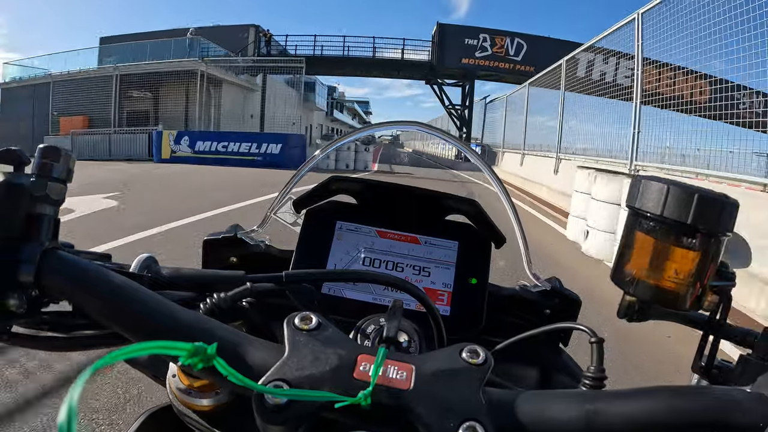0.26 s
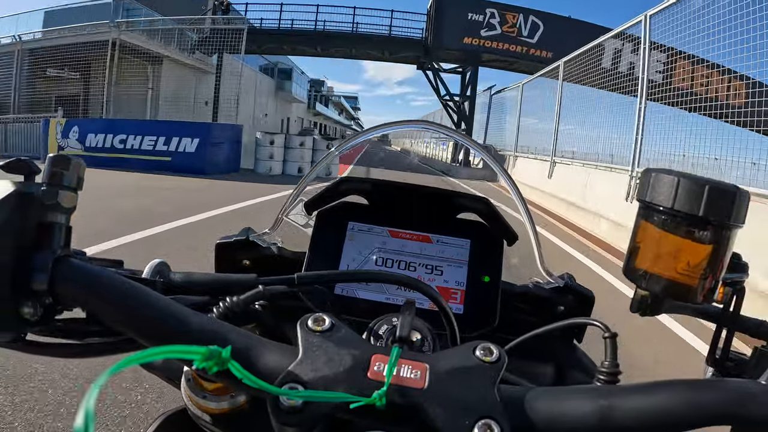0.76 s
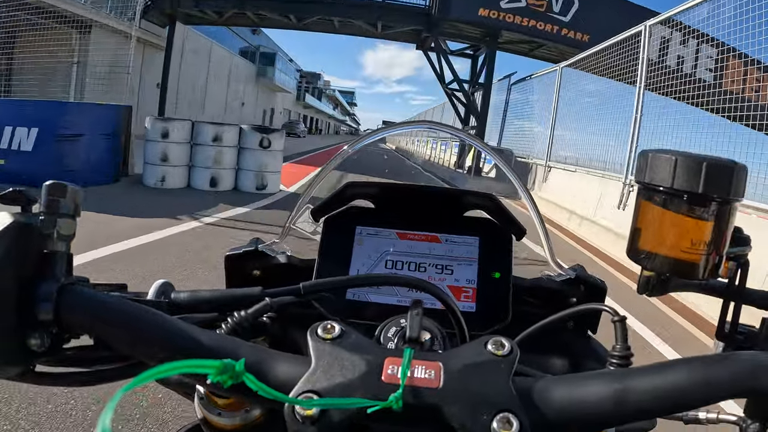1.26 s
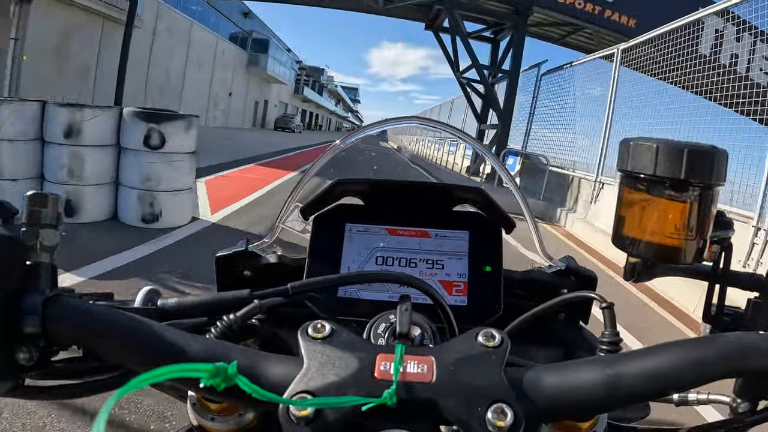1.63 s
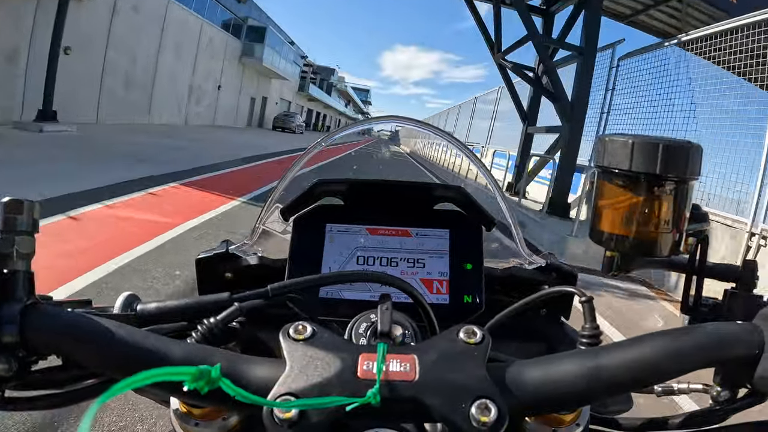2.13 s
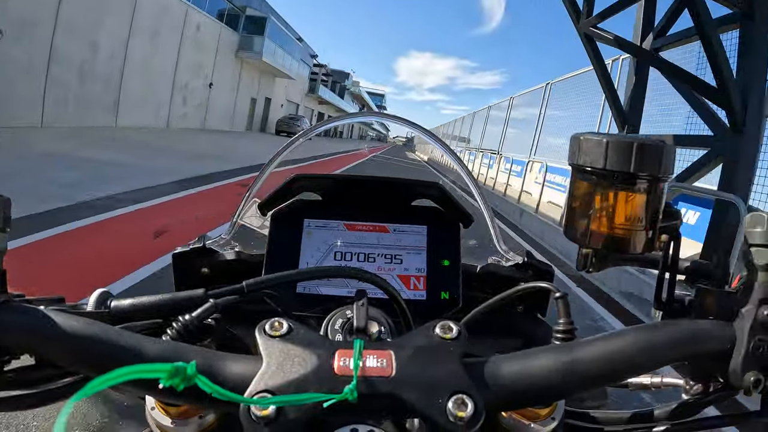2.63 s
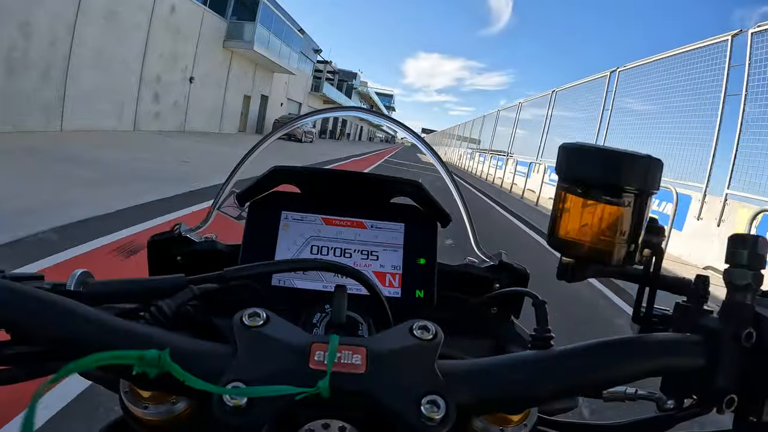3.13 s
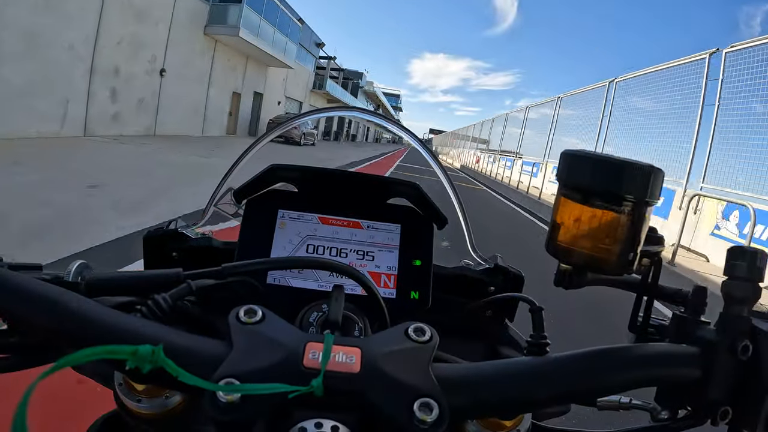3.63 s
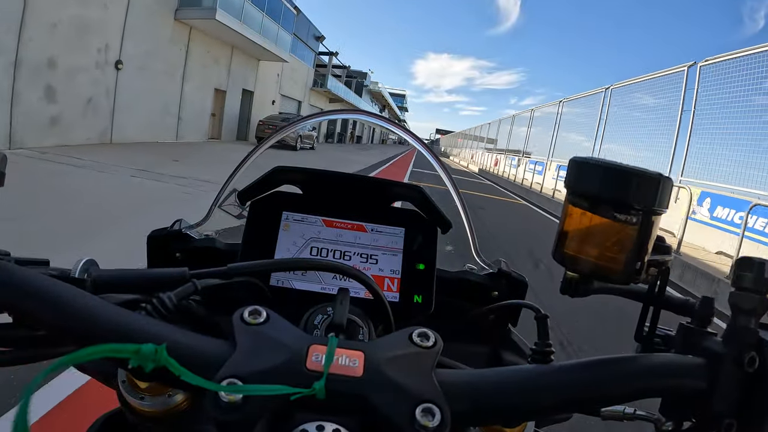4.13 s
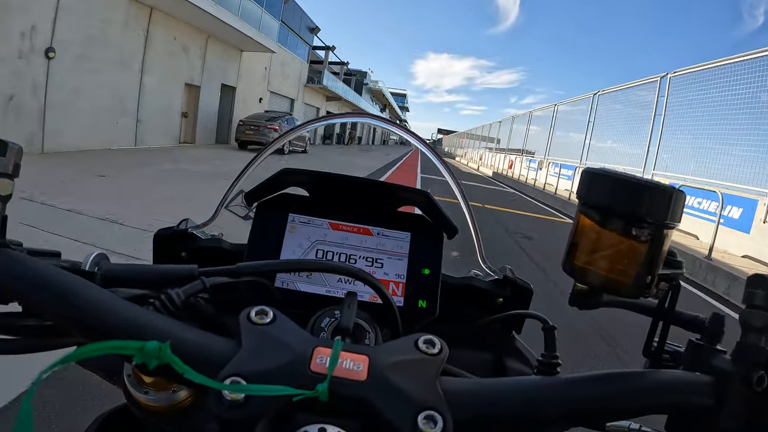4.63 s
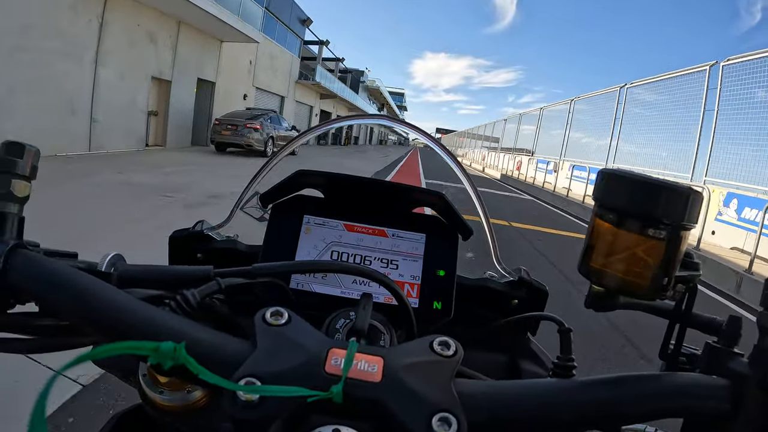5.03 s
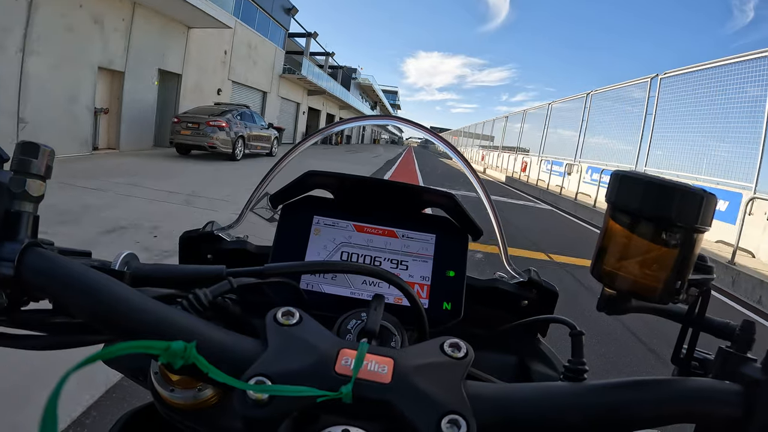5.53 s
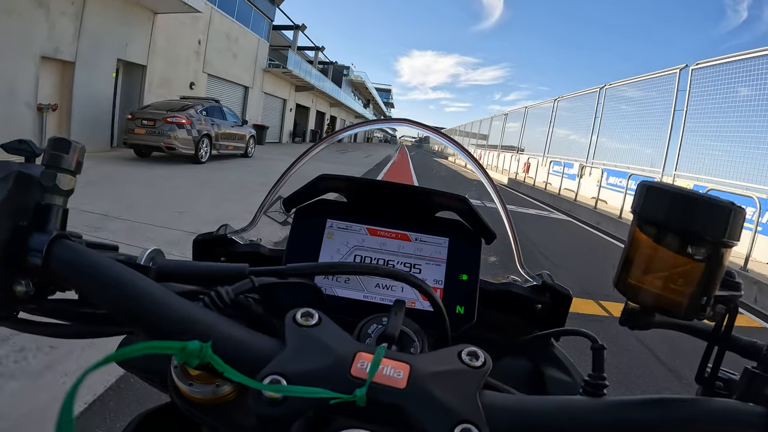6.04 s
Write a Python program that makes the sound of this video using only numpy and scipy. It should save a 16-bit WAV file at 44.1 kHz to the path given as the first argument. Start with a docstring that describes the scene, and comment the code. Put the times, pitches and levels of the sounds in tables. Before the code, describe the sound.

From 0 s, close behind the screen of a coasting motorcycle, a low, lumpy four-cylinder idle sags slightly under a droning fairing, fine metallic clatter and a falling chain hum. Small clicks come at 0.2 and 0.7 s, then knocks gather from 0.75 s. Around 1.15 s a heavy clunk with bright clicks marks the shift to neutral, and the chain hum slackens; a panel briefly sings upward at 1.3 s and another thud lands at 1.6 s. Wind flutters deeply from 1.9 to 2.5 s, with gusts afterwards. At 2.9 s a click and thud precede a drop to a quieter, darker sound: faint engine, muffled rumbling wind and light taps. From 4 s the chain hum returns, sinking; a brief grating burr comes near 4.6 s. A falling panel note sounds at 5.4 s, a rap at 5.5 s, and the idle re-emerges. Sharp knocks and rattling cluster from 5.95 to 6.2 s, ending at 6.3 s.

```python
"""In a pit lane, a four-cylinder motorcycle coasts by, heard from a microphone behind its screen.
The exhaust is a sum of partials of the firing cycle; the chain's hum sinks with the road speed.
Pulsed noise makes the engine's clatter; decaying noise and tones make the gearbox's clunk into neutral.
Shaped noise makes the wind's buffeting. About halfway the sound turns quieter and darker;
later the drive grates briefly and loose parts knock as the bike slows."""
import sys
import numpy as np
from scipy.fft import rfft, irfft, next_fast_len
from scipy.io import wavfile
from scipy.ndimage import uniform_filter1d, minimum_filter1d, map_coordinates

SR = 44100
rng = np.random.default_rng(int(sys.argv[2]) if len(sys.argv) > 2 else 0)


def inscribe(sig):
    """Save sig as 16-bit PCM at rate SR to the path in sys.argv[1].

    A 1-D sig is mono; a 2-D sig holds one channel per row.
    Samples are clipped to [-1, 1] before scaling.
    """
    pcm = np.round(np.clip(np.atleast_2d(sig).T, -1, 1) * 32767)
    wavfile.write(sys.argv[1], SR, pcm.astype(np.int16))


N = 277370

# Spectral densities (density_db) and partial levels are relative where the sum is scaled to rms 1.
# EARLY and LATE tables hold before and after the drop about halfway.

# idle speed in four-stroke cycles: time_s, cycle_rate_hz
IDLE_SPEED = [(0, 13.4), (.2, 13.29), (.45, 12.98), (.7, 12.8), (.9, 12.36), (1.1, 12.31), (1.3, 12.45),
              (1.55, 12.45), (1.9, 11.84), (2.3, 12.2), (2.8, 11.8), (6.29, 11.83)]
# strength of the exhaust: time_s, level_db
EXHAUST_LEVEL = [(0, -16), (.5, -18), (1.8, -16.5), (2.2, -22.5), (2.75, -20.5), (3.2, -29.5), (4.5, -36.5),
                 (5.4, -39.5), (5.7, -31), (6.29, -26.5)]
# partials of the exhaust: multiple_of_cycle_rate, level_db
EXHAUST_PARTIALS = [(3, -11), (4, -10), (5, 1.5), (7, -4.5), (8, 3), (9, -6), (11, -12), (12, -3.5),
                    (13, -3), (14, -5.5), (15, -7), (17, -3.5), (18, -7.5), (20, -11), (24, -9.5),
                    (28, -10.5), (30, -7), (32, -7.5), (33, -8), (35, -13)]
# how the pipes favour each partial as the idle drifts: frequency_hz, gain_db
PIPE_RESPONSE = [(61, 4), (64.5, 1), (67, -7), (80, 0), (98, -2), (106, 1.5), (125, 2.5), (149, 3),
                 (162, 1), (172, -1.5), (200, -0.5), (217, 2), (228, -0.5), (300, -1)]

# chain links meeting the sprocket, in step with the road speed: time_s, link_rate_hz
LINK_RATE = [(0, 196.6), (.5, 181.7), (1, 167), (1.5, 166), (3.6, 123), (4.3, 114.5), (4.6, 107),
             (4.9, 99.8), (5.25, 89.8), (5.5, 81), (5.62, 75.5), (5.8, 71), (6.29, 62)]
# strength of the chain's hum, which slackens at the gear change: time_s, gain_db
CHAIN_LEVEL = [(0, -24.5), (.85, -22), (1.15, -39.5), (3.7, -39.5), (4.3, -28.5), (5, -27), (5.35, -31),
               (5.5, -27), (5.72, -26), (5.8, -33.5), (5.87, -39.5), (6.29, -34)]
# partials of the chain: multiple_of_link_rate, level_db
CHAIN_PARTIALS = [(1, -4), (1.26, -7), (2, -0.5), (3, -13.5), (4, -5.5), (5, -16.5), (6, -12.5), (8, -16.5)]
# how the frame and fairing answer the chain: frequency_hz, gain_db
FRAME_RESPONSE = [(85, -17), (100, -10), (125, -14), (141, 6.5), (151, 5), (166, -3.5), (180, -5.5),
                  (205, -11), (228, -3.5), (290, -12.5), (325, -12), (345, -2), (390, 1.5), (428, -4),
                  (460, -12.5), (520, -16.5), (600, -13.5), (655, -10.5), (715, -28), (780, -24.5),
                  (835, -14.5), (890, -26), (960, -19), (1030, -28.5), (1400, -40.5)]
# flutter of the hum as the links seat unevenly: rough depth, and random knots per second
FLUTTER_DB, FLUTTER_HZ = 1.4, 22
# low frame resonance that swells the deep thrum
THRUM_HZ, THRUM_WIDTH_HZ, THRUM_DB = 61, 7.7, -0.5

# reference strength of the mechanical noise: time_s, level_db
MACHINE_LEVEL = [(0, -21), (1.9, -21), (2.65, -28), (2.93, -28), (3.1, -41.5), (3.6, -37), (4.2, -36),
                 (4.7, -34), (5.6, -30), (6.29, -32)]
# fairing's drone before the drop: frequency_hz, density_db
DRONE_EARLY = [(200, -24), (310, -12.5), (380, 0.5), (440, 0), (515, -11.5), (590, -6.5), (665, -12.5),
               (715, -24.5), (1200, -53.5)]
# fairing's drone after the drop: frequency_hz, density_db
DRONE_LATE = [(200, -21.5), (255, -8), (310, -18), (385, -0.5), (425, -0.5), (470, -8.5), (520, -12),
              (600, -12.5), (670, -10.5), (720, -23), (1200, -45.5)]
# fairing's rattle before the drop: frequency_hz, density_db
RATTLE_EARLY = [(600, -29.5), (730, -1.5), (835, 2.5), (940, 3), (1040, -4), (1170, -4.5), (1290, -1.5),
                (1420, -12), (1800, -24.5), (3500, -57.5)]
# fairing's rattle after the drop: frequency_hz, density_db
RATTLE_LATE = [(600, -24.5), (730, -3.5), (835, 0.5), (940, 0.5), (1040, -1.5), (1170, -6.5), (1290, -4),
               (1420, -13.5), (1800, -20.5), (3500, -56.5)]
# engine's clatter: frequency_hz, density_db
CLATTER_SPECTRUM = [(900, -14.5), (1400, -6.5), (1780, 2), (2100, -6.5), (2300, -5), (2550, -21),
                    (3050, -9.5), (3750, -11.5), (4200, -14.5), (4900, -18), (5300, -25.5), (6100, -22),
                    (8000, -35), (14000, -54.5)]
# chain rollers: frequency_hz, density_db
ROLLER_SPECTRUM = [(900, -18), (1520, 2), (1690, -5), (1900, -1), (2600, -6), (3050, -3), (3450, -6.5),
                   (3900, -3), (4950, -5.5), (5300, -15.5), (6000, -14.5), (8000, -23.5), (14000, -41)]
# ringing of the engine cases: centre_hz, width_hz, gain_db above the broad clatter
CASE_RESONANCES = [(1852, 41, -2), (3075, 210, -2), (3510, 50, -1.5), (3720, 63, 5.5), (4490, 67, -3.5),
                   (4880, 80, -1.5)]
# lifts of the fairing's rattle, the strongest near 6.1 s (0 dB leaves it as it is): start_s, length_s, lift_db
RATTLE_LIFTS = [(4.619, 0.13, 0.5), (5.288, 0.046, 0), (6.123, 0.25, 4)]
# levels relative to the machine reference
DRONE_DB, RATTLE_DB, CLATTER_DB, TAPPET_DB = -1, -18, -21.5, -61.5
# a rolling pace, and how the rattle grows for each halving of it
CRUISE_HZ, LOOSE_DB_PER_HALVING = 146, 2

# spells in which the slowing drive grates: start_s, length_s, level_db
GRATING_SPELLS = [(4.49, 0.03, -40), (4.645, .11, -40)]
# the grating: frequency_hz, density_db
GRATING_SPECTRUM = [(450, -12), (600, -2.5), (655, 7), (700, 3.5), (750, -13.5), (835, 4), (920, -21),
                    (1400, -27), (1900, -23), (2300, -35.5)]
# singing of a fairing panel: start_s, length_s, pitch_hz, glide_hz_per_s, level_db
PANEL_NOTES = [(1.28, 0.29, 402, 93, -28.5), (5.394, 0.2, 392.6, -72, -34.5)]

# clicks of gear lever and linkage: start_s, level_db, pitch_hz, t60_s, attack_s, gear_ring_db
GEAR_CLICKS = [(0.220, -33.5, 3550, .093, .001, -45), (.67, -37, 3340, 0.09, 0.0023, -42),
               (1.141, -26.5, 4300, 0.049, .002, -31.5), (1.243, -40, 4900, 0.068, 0.0017, -37),
               (1.404, -32, 4120, 0.025, 0.0013, -52), (2.8887, -30.5, 3560, .022, 0.00049, -44),
               (2.8895, -41, 8120, 0.013, 0.00033, -50)]
# a steel click: multiple_of_pitch, density_db
STEEL_SPECTRUM = [(.25, 1), (.6, -7), (0.82, -1.5), (1.15, -0.5), (1.351, -12.5), (1.749, -18.5),
                  (2.399, -33.5)]
# ring of the gears: pitch_hz, level_db, t60_s
GEAR_MODES = [(3570, -1, 0.07), (4600, -4, 0.064), (4940, -14, 0.018), (7424, -20, .06)]

# knocks of gearbox and loose parts: start_s, rap_db, thud_db, pitch_ratio
BODY_KNOCKS = [(0.476, -29, -36, 0.91), (.761, -32.5, -31, 1.16), (0.845, -30, -30, 1),
               (.871, -34, -33, 1.4), (.926, -32.5, -26, 1.1), (.962, -33, -26, 0.8),
               (1.142, -24, -21, 0.86), (1.151, -28, -14, 1.38), (1.158, -32, -12.5, 1.08),
               (1.205, -29, -26, 0.67), (1.259, -24, -21.5, 1.1), (1.33, -25.5, -31, 0.87),
               (1.573, -29, -24, 0.83), (1.62, -31, -13, 0.86), (1.697, -34.5, -31, 0.9),
               (1.894, -26, -23.5, 0.75), (2.891, -39, -21, .95), (2.92, -35, -31, 1),
               (2.943, -29, -35, .87), (3.026, -33, -32, 0.79), (3.3, -41, -48, 0.98), (3.367, -40, -54, 1),
               (3.505, -35, -43, .9), (3.545, -34, -48, .87), (3.595, -38, -52, 1.1),
               (3.719, -35, -56, 1.1), (4.111, -37, -44, 1.05), (4.142, -40.5, -45, 1.1),
               (4.641, -35, -40, 1.1), (4.895, -35, -35, 0.61), (5.302, -33, -41, 1.1),
               (5.543, -23.5, -37, 0.92), (5.812, -31, -43, 0.93), (5.957, -29, -31, 1.4),
               (5.9606, -20, -27, 0.93), (6.022, -50, -21, .96), (6.035, -26, -33, 0.95),
               (6.1, -44, -32, 0.88), (6.124, -23, -25, 1.03), (6.138, -30, -27, 1), (6.16, -28.5, -33, 1)]
# a rap on the bodywork: frequency_hz, density_db
RAP_SPECTRUM = [(300, -4.5), (560, 6.5), (850, 6.5), (1150, 7), (1500, -16.5), (2000, -14.5), (2500, -11),
                (3500, -22), (7000, -41.5), (14000, -65.5)]
# modes of the frame's thud: pitch_hz, level_db, t60_s
THUD_MODES = [(390, 5, 0.045), (445, 0.5, 0.078), (530, -14, 0.02), (603, -10.5, 0.024), (630, -10, 0.081)]
# a rap's crack (peak) and chatter (rms before decay), relative to the rap level
CRACK_DB, CHATTER_DB, CHATTER_T60_S, THUD_ATTACK_S = 3, -8, 0.032, 0.003
# small ticks of loose parts: middle level relative to the machine reference, and spread either way
TICK_DB, TICK_SPREAD_DB = -17.5, 5

# buffeting: frequency_hz, density_db
BUFFET_SPECTRUM = [(8, -12), (18, -3.5), (30, -1), (48, -1), (70, -4), (110, -10), (250, -47.5)]
# wind's roar before the drop: frequency_hz, density_db
ROAR_EARLY = [(35, -17), (70, -3.5), (110, -5), (150, -0.5), (230, -2), (310, -4), (450, -16.5), (700, -36),
              (1500, -49.5)]
# wind's roar after the drop: frequency_hz, density_db
ROAR_LATE = [(35, -20), (70, -4.5), (100, -1.5), (135, 2), (190, 0.5), (260, -3.5), (330, -13), (450, -24),
             (700, -39), (1500, -66)]
# gusts: start_s, length_s, buffet_db, roar_lift_db
WIND_GUSTS = [(0, 0.064, -42.5, 1.5), (0.467, 0.33, -21.5, 1), (2.011, 0.15, -22, 4), (2.197, 0.18, -19, 5),
              (2.49, 0.074, -14.5, 4), (2.656, 0.18, -15, 0.5), (2.85, 0.086, -17, 1.5),
              (3.062, 0.24, -19, 0), (3.388, 0.09, -19.5, 4), (3.557, 0.18, -18.5, 2),
              (3.817, 0.096, -20, 1), (3.987, 0.097, -18.5, 10), (4.147, 0.31, -21, 0.5),
              (4.607, 0.18, -22, 2.5), (5.836, 0.16, -23.5, 6), (6.022, 0.06, -19.5, 8),
              (6.175, 0.15, -25.5, 2)]
# spells in which the screen sheds eddies in step: start_s, length_s, level_db
EDDY_SPELLS = [(0.779, 0.16, -19.5), (1.925, 0.52, -17), (3.858, 0.081, -21)]
# each eddy spell counts from the same rate and sags
EDDY_HZ, EDDY_SAG_HZ_PER_S = 34, 13
# wind at the rolling pace; below that pace it weakens with each halving
BUFFET_DB, EARLY_DB, LATE_DB, WIND_DB_PER_HALVING = -35.5, -24.5, -28, 7.5
# how deeply each eddy pumps the early roar (0-1), and the rough lumps of the roar before and after the drop
PUMP, EARLY_LUMP_DB, LATE_LUMP_DB = 0.65, 1.5, 2.8
# ramps before the start and after the end of every gust or spell
SWELL_ATTACK_S, SWELL_RELEASE_S = 0.06, 0.08

LIMIT, LIMITER_SPAN_S, TOP_HZ = 0.6, 0.01, 14000


def amp(db):
    """Logarithmic level: decibels to a linear gain."""
    return 10 ** (np.asarray(db) / 20)


def unit(x):
    """Normalisation by mean power, to rms 1."""
    return x / np.sqrt(np.mean(x ** 2) + 1e-20)


def along(points, hz):
    """Interpolation of (frequency, value) points on a logarithmic frequency axis."""
    f, v = np.transpose(points)
    return np.interp(np.log(hz + 1), np.log(f + 1), v)


def curves(rows):
    """Linear interpolation in time: one value per sample for each column after the first."""
    s, *cols = np.transpose(rows)
    return [np.interp(np.arange(N) / SR, s, c) for c in cols]


def noise(size=N):
    """White noise: independent normal samples."""
    return rng.standard_normal(size)


def wobble(rate):
    """Slow random fluctuation: a smooth curve through this many random knots a second."""
    knots = noise(int(N * rate / SR) + 4)
    return map_coordinates(knots, [np.arange(N) * rate / SR])


def filtered(x, response):
    """Linear filtering: multiplication by a function of frequency."""
    m = next_fast_len(len(x) + 8192)
    return irfft(rfft(x, m) * response(np.fft.rfftfreq(m, 1 / SR)), m)[:len(x)]


def coloured(x, spectrum):
    """Spectral shaping to rms 1, with a response that keeps falling above the last point."""
    top_hz = spectrum[-1][0]
    return unit(filtered(x, lambda hz: amp(along(spectrum, hz)) / (1 + (hz / top_hz) ** 2)))


def steady(x, span):
    """Power levelling: evens out a noise's slow swells and keeps its fast flutter."""
    power = uniform_filter1d(x ** 2, max(int(span * SR), 1))
    return x / np.sqrt(np.abs(power) + 1e-9)


def add(track, s, sound):
    """Superposition of a sound on a track from time s."""
    part = track[round(s * SR):][:len(sound)]
    part += sound[:len(part)]


def strokes(turns, sharp):
    """Periodic excitation: one smooth peak for each whole turn, at rms 1."""
    return unit(np.exp(sharp * np.cos(2 * np.pi * turns)))


def swell(start, length):
    """Envelope of a gust or spell: linear rise, hold and linear release."""
    t = np.arange(N) / SR - start
    rise = 1 + t / SWELL_ATTACK_S
    fall = 1 - (t - length) / SWELL_RELEASE_S
    return np.clip(np.minimum(rise, fall), 0, 1)


def drop_blend(early, late):
    """Equal-power crossfade: about halfway one colour of sound gives way to another."""
    share = curves([(2.94, 0.05), (3.09, 0.93)])[0]
    return np.sqrt(1 - share) * early + np.sqrt(share) * late


def struck(spectrum, size):
    """Minimum-phase impulse response: a body's sharp, causal answer to one blow, at peak 1."""
    magnitude = amp(along(spectrum, np.fft.rfftfreq(2 * size, 1 / SR)))
    cepstrum = irfft(np.log(magnitude))[:size]
    causal = 2 * cepstrum * (np.arange(size) > 0)
    answer = irfft(np.exp(rfft(causal, 2 * size)))[:size]
    return answer / np.abs(answer).max()


def exhaust(cycle, cycle_hz, rough_db):
    """Periodic firing: uneven burns put fluttering lines on many multiples of the cycle rate."""
    note = np.zeros(N)
    for k, db in EXHAUST_PARTIALS:
        level_db = db + along(PIPE_RESPONSE, k * cycle_hz) + rough_db * wobble(6)
        note += amp(level_db) * np.sin(2 * np.pi * (k * cycle + rng.random()))
    return amp(curves(EXHAUST_LEVEL)[0]) * unit(note)


def machine(cycle, links, pace):
    """Forced vibration: firings, valves and chain rollers shake fairing and cases in quick bursts."""
    machine_db = curves(MACHINE_LEVEL)[0]
    idle = strokes(4 * cycle, sharp=0.13) * strokes(6 * cycle, sharp=0.062) * strokes(3 * cycle, sharp=0.024)
    rollers = strokes(links, sharp=0.15)

    def bursts(beat, grain_db):
        return beat * amp(grain_db * wobble(200)) * noise()

    def blend(early_spectrum, late_spectrum, idle_grain_db, roller_grain_db):
        # after the drop the rollers stand out over the idle
        return drop_blend(coloured(bursts(idle, idle_grain_db), early_spectrum),
                          coloured(bursts(rollers, roller_grain_db), late_spectrum))

    drone = steady(blend(DRONE_EARLY, DRONE_LATE, -0.66, 1.7), span=0.075)
    drone = amp(machine_db + DRONE_DB) * drone

    lift_db = sum(db * swell(s, length) for s, length, db in RATTLE_LIFTS)
    rattle_db = machine_db + RATTLE_DB - LOOSE_DB_PER_HALVING * pace + lift_db
    rattle = amp(rattle_db + 1.0 * wobble(24)) * blend(RATTLE_EARLY, RATTLE_LATE, 1.0, 0.3)

    def cases(f):
        return 1 + sum(amp(db) * 1j * f * w / (c * c - f * f + 1j * f * w) for c, w, db in CASE_RESONANCES)

    metal = blend(CLATTER_SPECTRUM, ROLLER_SPECTRUM, 1.44, 1.0)
    clatter = amp(machine_db + CLATTER_DB + 0.84 * wobble(16)) * unit(filtered(metal, cases))

    # one tappet ticks more brightly than the rest, once a cycle
    bright = coloured(noise(), [(3000, -23.0), (6000, 2.5), (8500, -6.5), (11000, -21.0)])
    tappet = amp(machine_db + TAPPET_DB) * strokes(cycle, sharp=16) * bright
    return drone + rattle + clatter + tappet


def chain(links, link_hz):
    """Resonance: each sinking partial swells as it slides through a mode of the frame."""
    def partial(k):
        # slack in the chain jitters the timing, which blurs the high partials most
        jitter = 0.0014 * k ** 2.3 * wobble(45)
        return np.sqrt(2) * np.sin(2 * np.pi * (k * links + rng.random() + jitter))

    hum = np.zeros(N)
    for k, db in CHAIN_PARTIALS:
        level_db = db + along(FRAME_RESPONSE, k * link_hz) + FLUTTER_DB * wobble(FLUTTER_HZ)
        hum += amp(level_db) * partial(k)
    detuning = 2 * (link_hz * 2 / 3 - THRUM_HZ) / THRUM_WIDTH_HZ
    thrum = amp(THRUM_DB) / np.hypot(1, detuning) * partial(2 / 3)
    return amp(curves(CHAIN_LEVEL)[0]) * (hum + thrum)


def grating(links, grain_db):
    """Amplitude-modulated noise: a short rough burr pulses with the chain links."""
    rough = strokes(links, sharp=0.67) * amp(grain_db * wobble(60)) * noise()
    spells = sum(amp(db) * swell(s, length) for s, length, db in GRATING_SPELLS)
    return coloured(rough, GRATING_SPECTRUM) * spells


def clicks():
    """Impact of steel on steel: short bright noise bursts set the gears ringing."""
    out, t = np.zeros(N), np.arange(SR // 5) / SR
    for s, db, hz, t60, attack, ring_db in GEAR_CLICKS:
        spectrum = [(hz * k, level) for k, level in STEEL_SPECTRUM]
        steel = amp(db - 60 * t / t60) * coloured(noise(len(t)), spectrum)
        ring = sum(amp(ring_db + level - 60 * t / life) * np.sin(2 * np.pi * (f * t + rng.random()))
                   for f, level, life in GEAR_MODES)
        add(out, s, (1 - np.exp(-t / attack)) * (steel + ring))
    return out


def knocks():
    """Impact and modal decay: a dry crack on the bodywork, a short chatter and a thud in the frame."""
    out, t = np.zeros(N), np.arange(SR // 5) / SR
    rise = np.sin(np.pi / 2 * np.minimum(t / THUD_ATTACK_S, 1)) ** 2
    for s, rap_db, thud_db, pitch in BODY_KNOCKS:
        body = [(hz * pitch, db) for hz, db in RAP_SPECTRUM]
        crack = amp(rap_db + CRACK_DB) * struck(body, size=len(t))
        chatter = amp(rap_db + CHATTER_DB - 60 * t / CHATTER_T60_S) * coloured(noise(len(t)), body)
        thud = np.zeros(len(t))
        for hz, db, t60 in THUD_MODES:
            phase = pitch * hz * t + 0.29 * rng.standard_normal()
            thud += amp(thud_db + db - 60 * t / t60) * np.sin(2 * np.pi * phase)
        add(out, s, crack + rise * (chatter + thud))
    return out


def panel(rough_db):
    """Sympathetic vibration: a fairing panel sings on one fluttering, gliding note."""
    t = np.arange(N) / SR
    song = np.zeros(N)
    for s, length, hz, glide, db in PANEL_NOTES:
        age = t - s
        tone = np.sqrt(2) * np.sin(2 * np.pi * (hz * age + glide * age ** 2 / 2))
        song += amp(db) * swell(s, length) * tone
    return amp(rough_db * wobble(40)) * song


def ticks(count):
    """Random impacts: loose parts tap faintly, harder when the machine noise is stronger."""
    out, t = np.zeros(N), np.arange(SR // 20) / SR
    for when, size, pitch in rng.random((count, 3)):
        body = [(hz * (0.62 + 0.35 * pitch), db) for hz, db in RAP_SPECTRUM]
        level_db = TICK_DB + TICK_SPREAD_DB * (2 * size - 1)
        envelope = amp(level_db - 60 * t / 0.059) * np.minimum(t / 0.0018, 1) ** 2
        add(out, when * N / SR, envelope * coloured(noise(len(t)), body))
    return amp(curves(MACHINE_LEVEL)[0]) * out


def wind(pace):
    """Turbulence: gusts and shed eddies thump the microphone over a broad roar, deeper after the drop."""
    t = np.arange(N) / SR

    def shed(age):
        return np.sqrt(2) * np.sin(2 * np.pi * (EDDY_HZ * age - EDDY_SAG_HZ_PER_S * age ** 2 / 2))

    eddies = sum(amp(db) * swell(s, length) * shed(t - s) for s, length, db in EDDY_SPELLS)
    eddies = amp(1.1 * wobble(3.3)) * eddies
    flow = amp(WIND_DB_PER_HALVING * np.minimum(pace, 0))

    gusts = np.max([amp(db) * swell(s, length) for s, length, db, _ in WIND_GUSTS], axis=0)
    strength = np.hypot(amp(BUFFET_DB) * flow, gusts)
    buffet = strength * steady(coloured(noise(), BUFFET_SPECTRUM), span=0.041)

    pumping = 1 + PUMP * sum(swell(s, length) * shed(t - s) for s, length, _ in EDDY_SPELLS)
    early_lumps = pumping * amp(EARLY_LUMP_DB * wobble(22)) * noise()
    early = amp(EARLY_DB) * steady(coloured(early_lumps, ROAR_EARLY), span=0.24)
    late_lumps = amp(LATE_LUMP_DB * wobble(35)) * noise()
    late = amp(LATE_DB) * steady(coloured(late_lumps, ROAR_LATE), span=0.2)
    lift_db = sum(db * swell(s, length) for s, length, _, db in WIND_GUSTS)
    return eddies + buffet + flow * amp(lift_db) * drop_blend(early, late)


def scene():
    """Superposition: engine and chain turn independently, and the road speed sets the wind."""
    cycle_hz = curves(IDLE_SPEED)[0]
    cycle = np.cumsum(cycle_hz * (1 + 0.0022 * wobble(12))) / SR
    link_hz = curves(LINK_RATE)[0]
    links = np.cumsum(link_hz) / SR
    pace = np.log2(link_hz / CRUISE_HZ)  # doublings of speed above the rolling pace
    engine = exhaust(cycle, cycle_hz, rough_db=0.7) + machine(cycle, links, pace)
    drive = chain(links, link_hz) + grating(links, grain_db=3.0)
    contacts = clicks() + knocks() + panel(rough_db=1.5) + ticks(count=45)
    return (engine + drive + contacts + wind(pace))[None]


def record(dry):
    """Peak limiting and band limiting: a smoothed gain holds down peaks, then the top is cut off."""
    span = int(LIMITER_SPAN_S * SR)
    needed = np.minimum(1, LIMIT / (np.abs(dry[0]) + 1e-9))
    gain = uniform_filter1d(minimum_filter1d(needed, size=span), size=span)
    return filtered(dry[0] * gain, lambda hz: hz < TOP_HZ)[None]


dry = scene()
out = record(dry)
inscribe(out)
```